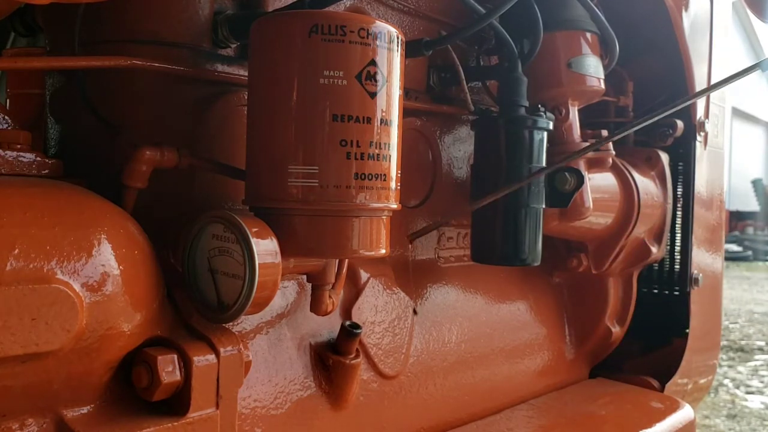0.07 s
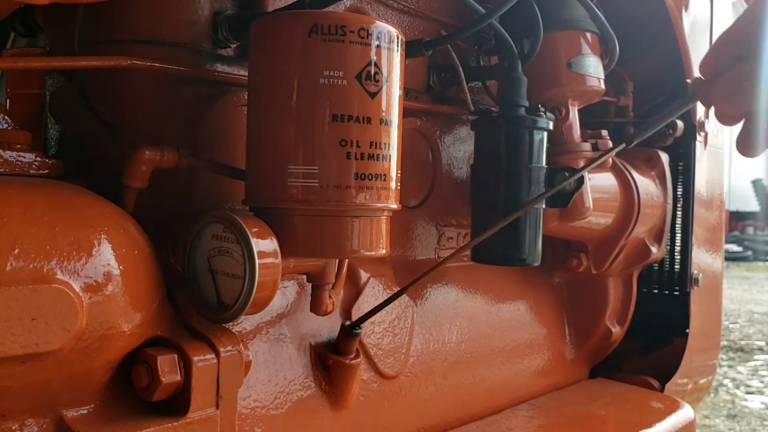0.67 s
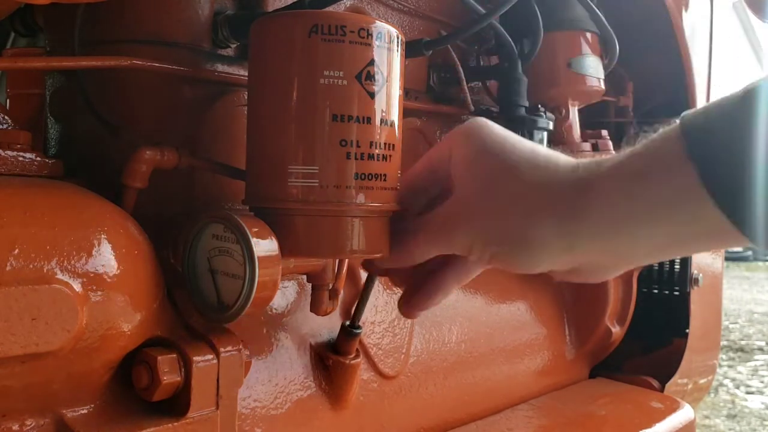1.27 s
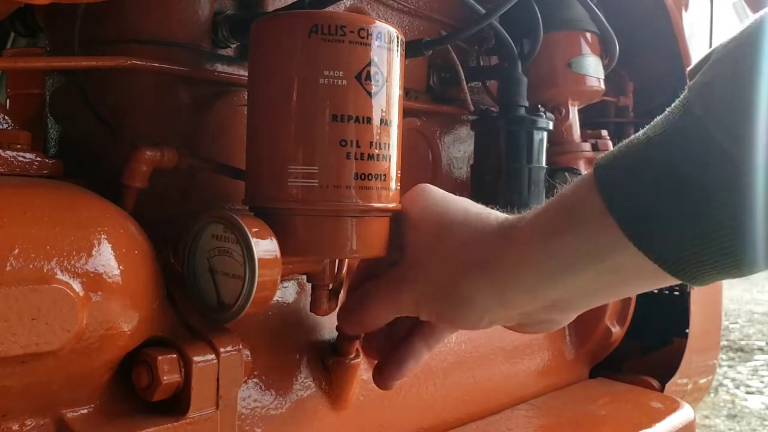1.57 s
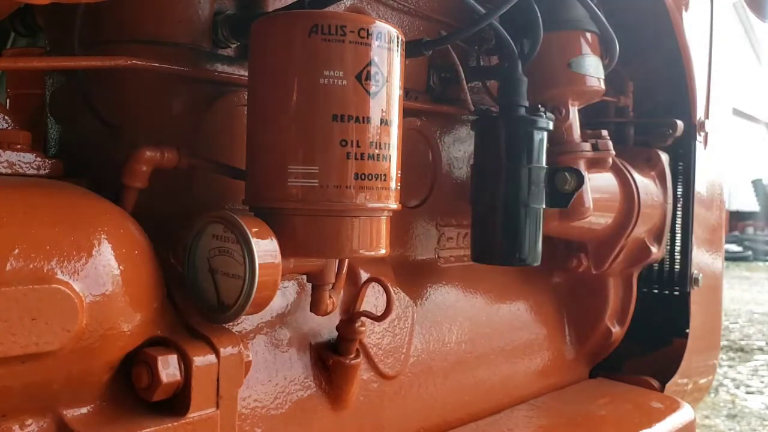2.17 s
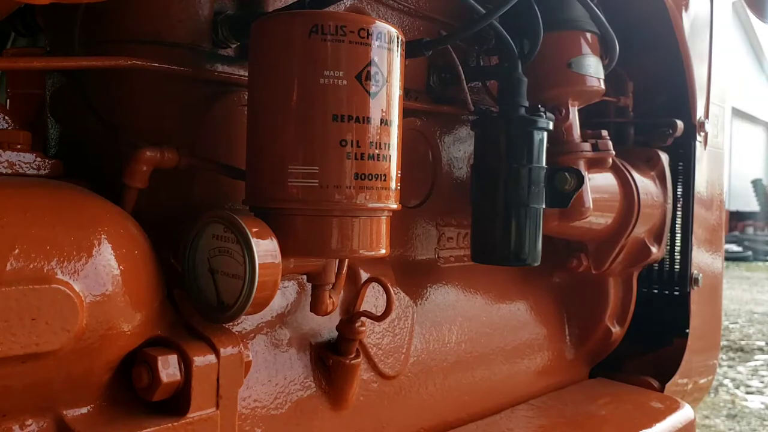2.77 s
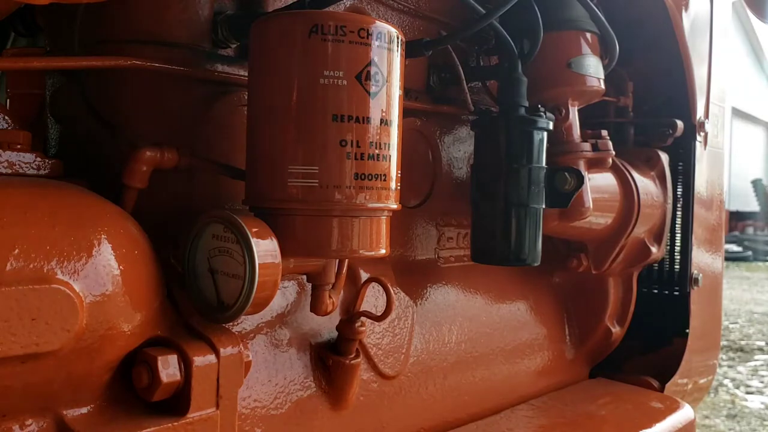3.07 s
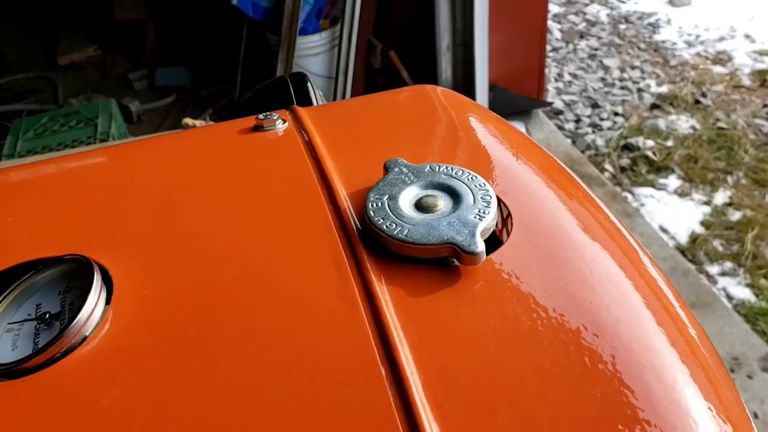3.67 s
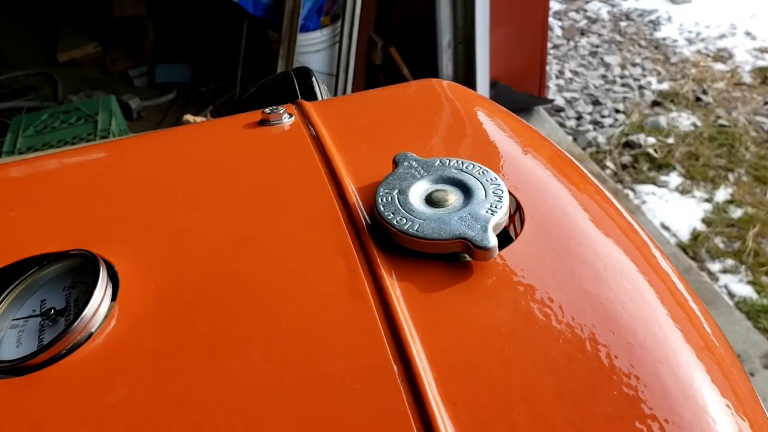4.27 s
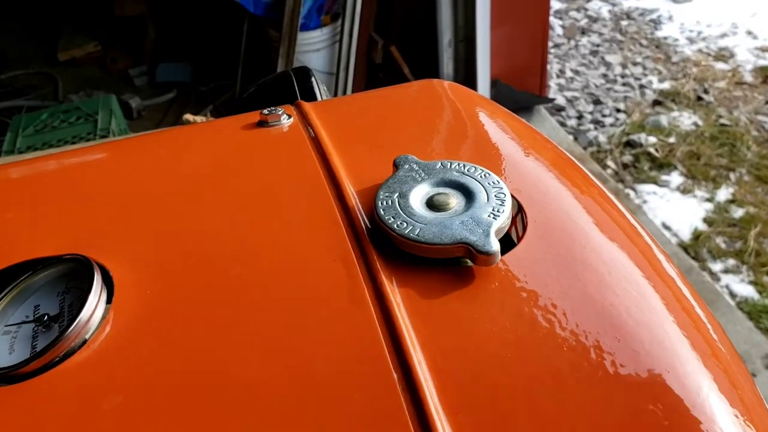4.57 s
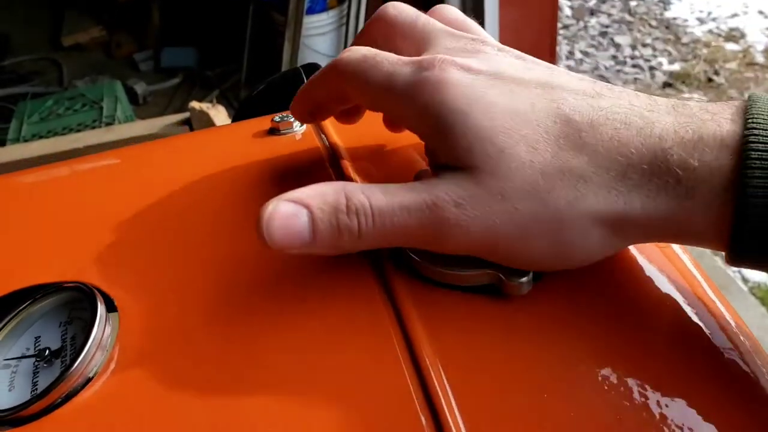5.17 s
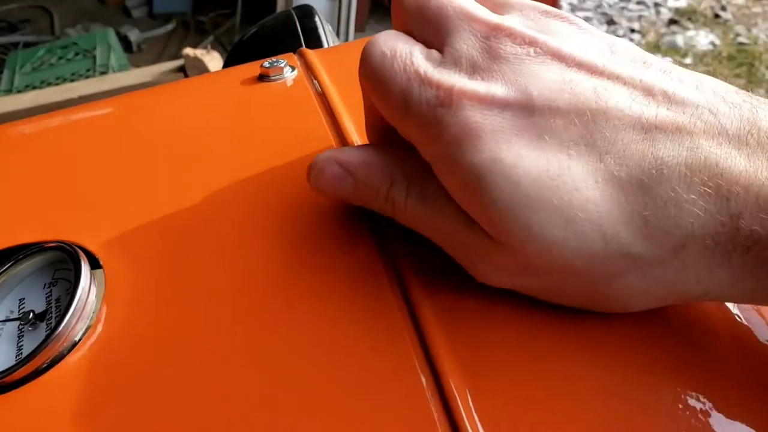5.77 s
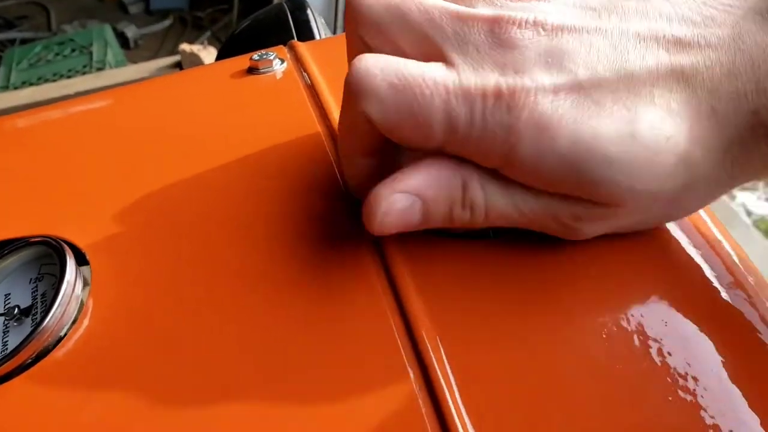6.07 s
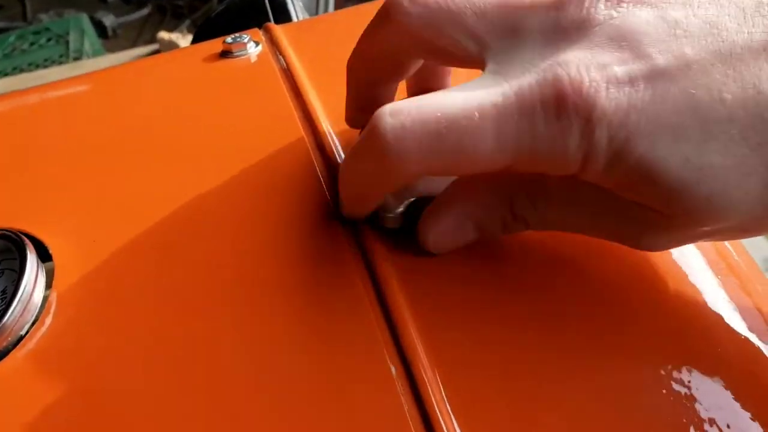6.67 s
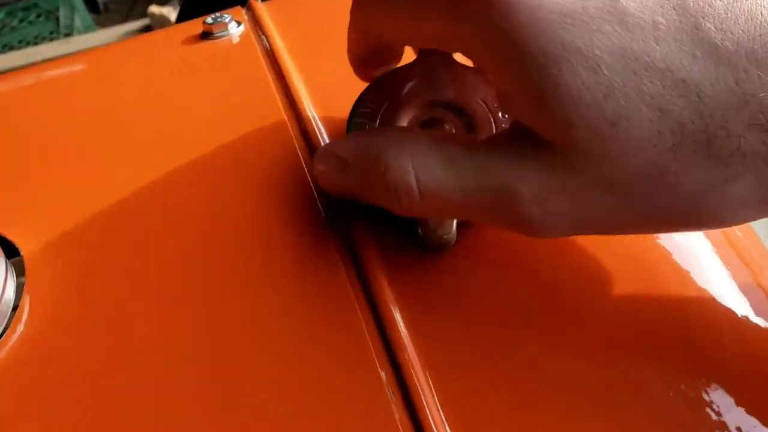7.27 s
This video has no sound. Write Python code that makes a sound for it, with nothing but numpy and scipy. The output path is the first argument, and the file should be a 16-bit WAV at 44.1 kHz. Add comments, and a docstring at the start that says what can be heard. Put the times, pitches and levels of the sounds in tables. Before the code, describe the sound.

A close stereo microphone in the open air hears light metallic taps and a short scrape as a dipstick goes home, followed by rustling cloth and a gritty shoe scuff. A quiet pause leaves only a faint, far rumble. Then a steel radiator cap turns with a low grinding groan and much louder hollow clunks, rings briefly like a small bell as it comes free, and clanks against the neck again.

```python
"""Outdoors beside a parked tractor, a stereo microphone close to the engine. A little to the right, a
dipstick ticks against its tube and slides home, a sleeve rustles, a shoe scuffs. Then, loudest, a hand
twists off the steel radiator cap: its lugs grind and knock on the filler neck, the radiator and
sheet-metal bonnet boom, and the loose cap pings once. A faint rumble from far off lies under it all."""
import sys
import numpy as np
from scipy import signal
from scipy.fft import rfft, irfft, next_fast_len
from scipy.io import wavfile
from scipy.ndimage import uniform_filter1d

SR = 44100
rng = np.random.default_rng(int(sys.argv[2]) if len(sys.argv) > 2 else 0)


def master_out(mix):
    """Clip the mix to full scale and print it as 16-bit PCM to the path in sys.argv[1]."""
    frames = np.transpose(np.atleast_2d(mix))
    ceiling = np.clip(frames, -1, 1)
    pcm = np.round(ceiling * 32767).astype(np.int16)
    wavfile.write(sys.argv[1], SR, pcm)


N = 331191
TIME = np.arange(N) / SR
TREBLE_HZ = 15500  # upper edge of the bright noises

# where the cap sits at the microphone: (frequency [Hz], left minus right [dB])
CAP_BALANCE = [(60, 5), (110, 1.5), (200, 1.5), (380, -6.5), (700, -2.5), (1290, -2.5), (2380, -4),
               (4400, -8), (8120, -11.5), (15000, -11)]
# how alike its two channels are: (frequency [Hz], correlation [0-1])
CAP_LIKENESS = [(100, .95), (300, 0.97), (700, 0.38), (1500, 0.31), (4000, 0.062), (15000, 0.061)]
AT_CAP = (CAP_BALANCE, CAP_LIKENESS)
# the shell, that is radiator, bonnet and filler neck: (mode [Hz], level [dB], t60 [s])
SHELL_MODES = [(140.5, -9, 0.35), (192.8, -7.5, 0.55), (229.2, -9, 0.87), (318, -8.5, 0.8), (353, -1, 0.23),
               (385, -9, 0.23), (443, -9, 0.18), (483, -11, 0.19), (494, -5, 0.15), (594, 4, 0.097),
               (735, -3, 0.27), (789, 1, 0.25), (887, -3, 0.31), (987, -4, 0.25), (1090, -0.5, 0.16),
               (1260, -2, 0.26), (1365, 0.5, 0.16), (1586, 4.5, 0.098), (1670, 2, 0.074), (2000, -11, 0.15),
               (2160, -16, 0.16), (2430, -16.5, 0.39), (2630, -11.5, 0.21), (2650, -13.5, 0.28),
               (2820, -23.5, 0.36), (4730, -23, 0.16), (5570, -4, 0.051), (8600, -7, 0.049),
               (12090, 12, 0.028)]
# its dense overtones: (frequency [Hz], level [dB])
SHELL_COLOUR = [(53, -48), (90, -0.5), (251, -5.5), (347, -1), (429, -4), (733, -3.5), (834, -8.5),
                (1390, -11.5), (1840, -17), (2480, -19), (3280, -30.5), (3980, -28), (8240, -37),
                (11900, -31.5), (15000, -31.5)]
# thud, clank and tick of a blow on it:
# (low [Hz], high [Hz], rise [s], crack t60 [s], tail t60 [s], tail [dB], modes [dB])
SHELL_BANDS = [(97, 751, 0.0023, 0.095, 0.57, -14.5, -7), (703, 7000, 0.0003, 0.027, 0.42, -14, -7.5),
               (2806, TREBLE_HZ, 0.0004, 0.019, .15, -10, -7.5)]
# the cap tapping the neck: (time [s], thud [dB], clank [dB], tick [dB], clank [Hz], tick [Hz])
CAP_TAPS = [(5.486, -66, -64, -58, 1300, 6700), (5.588, -78, -59, -66, 1110, 6070),
            (5.784, -63.5, -64.5, -60, 1380, 5800), (6.167, -42.5, -42.5, -54, 810, 5670),
            (6.343, -57, -54.5, -58, 1380, 3700), (6.384, -43, -52, -55.5, 1280, 4200),
            (6.678, -45, -47, -52, 1460, 4430), (6.718, -42, -42.5, -53, 1020, 5600),
            (6.975, -39.5, -38.5, -42, 1130, 4370), (7.289, -58, -50.5, -60.5, 1430, 5240),
            (7.323, -46, -35, -39, 1570, 3650), (7.425, -53, -44.5, -60, 1540, 3900),
            (7.466, -44, -42.5, -56.5, 1490, 3520)]
# the cap dropping over a notch:
# (time [s], thud [dB], clank [dB], tick [dB], thud [Hz], clank [Hz], tick [Hz], fall time [s])
CAP_DROPS = [(5.95, -32.5, -32, -31, 343, 1740, 5800, 0.0078),
             (6.527, -36, -41, -54, 620, 780, 4100, 0.0037),
             (6.684, -31, -37, -42.5, 345, 1410, 4430, .003),
             (6.816, -37.5, -36.5, -45, 382, 1230, 5500, .011),
             (7.333, -27.5, -26.5, -25.5, 335, 1620, 7440, 0.0066)]
# bright click, heavy landing and higher rebound within each drop:
# (delay [fall times], thud [dB], clank [dB], tick [dB], clank pitch [ratio])
DROP_CONTACTS = [(0, -4, -0.5, 0.5, 1.03), (0.999, -0.5, -4, -11, 1.04), (3.3, -3, -6.5, -32, 1.55)]


def cap_knocks():
    """Close by, the lugs tap the neck and drop over its notches; radiator and bonnet boom."""
    contacts = taps(CAP_TAPS, thud_hz=361)
    for s, thud, clank, tick, thud_hz, clank_hz, tick_hz, fall in CAP_DROPS:
        for delay, thud_db, clank_db, tick_db, ratio in DROP_CONTACTS:
            levels = (thud + thud_db, clank + clank_db, tick + tick_db)
            contacts.append((s + delay * fall, *levels, thud_hz, clank_hz * ratio, tick_hz))
    return blows(contacts, SHELL_MODES, SHELL_COLOUR, SHELL_BANDS, AT_CAP, contact_db=11, snap_db=0.5)


# short turns of the wrist: (middle [s], length [s], groan [dB])
WRIST_TURNS = [(5.3, 0.16, -62), (5.63, 0.15, -60), (5.84, 0.22, -57.5), (6.01, 0.076, -44.5),
               (6.11, 0.12, -44), (6.29, 0.094, -49.5), (6.41, 0.15, -55), (6.58, 0.22, -50.5),
               (6.76, 0.16, -47), (6.89, 0.29, -51), (7.16, 0.21, -52.5), (7.42, 0.37, -48.5)]
# fingers or the cap's rim slipping over steel: (middle [s], length [s], grit [dB])
RIM_SLIPS = [(5.24, 0.14, -67), (5.48, 0.21, -66), (5.64, 0.23, -70.5), (6.14, 0.21, -54.5),
             (6.68, 0.091, -59), (7.347, 0.036, -39)]
# low groan of the cap on its seat: (frequency [Hz], level [dB])
GROAN_COLOUR = [(71, -36), (120, 4), (211, -2.5), (277, 3), (352, 4), (455, -9), (572, -6.5), (682, -24),
                (759, -11.5), (1120, -12), (1490, -13), (1820, -17.5), (2170, -18), (2690, -25),
                (3000, -26), (3900, -46), (6600, -120)]
# high grit of rubbed steel: (frequency [Hz], level [dB])
GRIT_COLOUR = [(1470, -37), (2500, 1), (2850, -2), (3580, -8), (3920, -3.5), (4990, -6), (5870, -3),
               (8860, -12.5), (12100, 1), (14500, -4)]


def cap_grind():
    """Each turn grinds the lugs round the neck: a groan in the shell's low modes, with grit on top."""
    groan_gain = swells(WRIST_TURNS)
    grit_gain = np.hypot(undb(-16) * groan_gain, swells(RIM_SLIPS))
    shell = rub(N, [m for m in SHELL_MODES if m[0] < 700], AT_CAP, rate=140)
    friction = noise(N, GROAN_COLOUR, 145, 3900, AT_CAP) * undb(1.1 * walk(N, 90))
    groan = unit(friction + undb(-5) * shell)
    grit = unit(noise(N, GRIT_COLOUR, 3300, TREBLE_HZ, AT_CAP) * undb(1.9 * walk(N, 500)))
    return groan_gain * groan + grit_gain * grit


# the cap hanging free: (mode [Hz], level [dB], t60 [s])
CAP_MODES = [(1156, -0.5, 0.89), (3950, 1, 0.04), (4840, -6, .1), (5620, -16, 0.17), (7920, -10, 0.078),
             (8920, -33, .11), (11800, 10.5, 0.017)]


def cap_ping():
    """The freed cap rings like a small bell until the fingers close on it again."""
    out, t = np.zeros((2, N)), np.arange(SR) / SR
    ping = ring(t, CAP_MODES, AT_CAP, scatter_db=0, detune=0)
    grip = np.interp(t, [.16, .22], [1, 0])
    add(out, 6.976, undb(-38) * ping * grip)
    return out


# the engine's side, to the right of the microphone: (frequency [Hz], left minus right [dB])
ENGINE_BALANCE = [(60, -7), (110, -8.5), (200, -13), (380, -7), (700, -9), (1290, -3.0), (2380, -6.5),
                  (4400, -11), (8120, -14), (15000, -16.5)]
# how alike its two channels are: (frequency [Hz], correlation [0-1])
ENGINE_LIKENESS = [(100, 0.9), (300, 0.57), (700, 0.046), (1500, 0), (15000, 0.066)]
AT_ENGINE = (ENGINE_BALANCE, ENGINE_LIKENESS)
# the dipstick's steel blade in its tube: (mode [Hz], level [dB], t60 [s])
BLADE_MODES = [(537, -3, 0.1), (1200, -10, 0.45), (1408, -1, 0.11), (1640, -6.5, .1), (1875, -3, 0.098),
               (2800, -6, 0.047), (4500, -4, 0.1), (5300, -19.5, 0.0288), (5650, -9, 0.0286),
               (5600, 4.5, 0.06), (6800, -5.5, 0.035), (7770, -1, 0.0322), (11300, -6, .03),
               (13000, 3, 0.039)]
# its dense overtones: (frequency [Hz], level [dB])
BLADE_COLOUR = [(88, -34.5), (150, 5), (225, -10.5), (486, 2.5), (818, -7.5), (1840, -1.5), (2230, -10),
                (2700, -5.5), (3600, -19), (5510, -8.5), (6060, -14), (7940, -11), (8920, -19.5),
                (13100, -7.5), (15000, -20.5)]
# thud, clank and tick of a blow on it:
# (low [Hz], high [Hz], rise [s], crack t60 [s], tail t60 [s], tail [dB], modes [dB])
BLADE_BANDS = [(197, 490, 0.003, 0.069, 0.29, -3, -8), (715, 4200, 0.001, 0.027, 0.23, -15.5, -10),
               (2990, TREBLE_HZ, 0.000081, 0.028, .055, -9.5, -8)]
# blade and fingers touching the tube: (time [s], thud [dB], clank [dB], tick [dB], clank [Hz], tick [Hz])
TUBE_TAPS = [(0.234, -86, -57, -57.5, 2800, 3200), (0.51, -90, -62, -50, 1940, 5600),
             (0.548, -93, -63, -52.5, 2220, 5400), (0.561, -96, -74, -49, 1784, 5600),
             (0.572, -91, -64.5, -52, 1950, 5600), (1.191, -70.5, -64, -42.5, 1850, 7600),
             (1.229, -82, -55, -44.5, 1390, 5630), (1.329, -56.5, -42, -38.5, 1820, 5100),
             (1.461, -52.5, -54.5, -66, 1090, 6400), (1.536, -61, -58.5, -78, 1220, 6360),
             (1.719, -82, -54, -57.5, 2870, 3240)]
# pushes down the tube: (time [s], length [s], rasp [dB], note [dB], start [Hz], end [Hz])
BLADE_SLIDES = [(0.989, 0.024, -57, -78, 1950, 1930), (1.004, 0.011, -50.5, -75, 1920, 1790),
                (1.084, 0.017, -60.5, -84, 1880, 1800), (1.189, 0.038, -43, -49, 1775, 1487),
                (1.28, 0.025, -58, -57, 1940, 1638), (1.326, 0.052, -79, -56.5, 1318, 1133),
                (1.457, 0.083, -84, -58, 866, 503)]


def dipstick():
    """Near right, the blade taps the tube's mouth and rasps down it, its note falling as it goes deeper."""
    contacts = taps(TUBE_TAPS, thud_hz=504)
    out = blows(contacts, BLADE_MODES, BLADE_COLOUR, BLADE_BANDS, AT_ENGINE, contact_db=8, snap_db=2)
    high_modes = [m for m in BLADE_MODES if m[0] > 2500]
    for s, length, rasp_db, note_db, start_hz, end_hz in BLADE_SLIDES:
        n = int((length + .08) * SR)
        t = np.arange(n) / SR
        push = np.minimum(t / 0.0053, 1) * fade(np.maximum(t - length, 0), t60=0.1)
        grit = noise(n, BLADE_COLOUR, 4600, TREBLE_HZ, AT_ENGINE) * undb(4.5 * walk(n, 700))
        rasp = unit(grit + undb(-3.5) * rub(n, high_modes, AT_ENGINE, rate=1400))
        note = narrow(np.interp(t, [0, length], [start_hz, end_hz]), width_hz=0.35 * start_hz)
        add(out, s, push * (undb(rasp_db) * rasp + undb(note_db) * note))
    return out


# a shoe dragged over grit: (frequency [Hz], level [dB])
SCUFF_COLOUR = [(150, -44), (250, -15.5), (559, -5), (620, -6), (687, -1), (873, -13.5), (1000, -5.5),
                (1590, -7.5), (1920, -15.5), (2480, -7), (2800, -12.5), (5010, -12.5), (8970, -23),
                (12000, -10), (15000, -19)]
# weight coming onto the sole: (middle [s], length [s], level [dB])
SOLE_PRESS = [(2.608, 0.08, -43.5)]
# soft bumps, taps and a snap of shifting feet: (time [s], level [dB], low [Hz], high [Hz], t60 [s])
FOOT_BUMPS = [(1.952, -48.5, 120, 600, 0.026), (1.998, -47.5, 90.5, 290, 0.11),
              (2.108, -48.5, 110, 565, 0.078), (2.321, -54.5, 784, 1800, 0.18),
              (2.757, -54, 700, 15000, 0.021), (3.934, -63.5, 594, 1840, 0.015),
              (3.938, -42.5, 50, 119, 0.042)]
# uncoloured noise: (frequency [Hz], level [dB])
FLAT = [(20, 0), (20000, 0)]


def feet():
    """Beside the engine, weight shifts with soft bumps; one sole squeals as it slips and drags over grit."""
    scuff_s, attack_s, hold_s = 2.558, 0.0015, 0.023
    since = TIME - scuff_s
    bite = np.clip(since / attack_s, 0, 1) * fade(np.maximum(since - hold_s, 0), t60=0.27)
    sole = unit(noise(N, SCUFF_COLOUR, 247, 3000, AT_ENGINE) * undb(1.6 * walk(N, 300)))
    grit = unit(noise(N, SCUFF_COLOUR, 2000, TREBLE_HZ, AT_ENGINE) * undb(0.79 * walk(N, 1000)))
    out = swells(SOLE_PRESS) * sole + undb(-39.5) * bite * grit
    t = np.arange(SR // 4) / SR
    squeal = narrow(np.full(len(t), 5050), width_hz=380) * fade(t, t60=.08)
    add(out, 2.559, undb(-46) * squeal)
    for s, db, lo, hi, t60 in FOOT_BUMPS:
        onset = 1 - np.exp(-t * hi / 2)
        bump = noise(len(t), FLAT, lo, hi, AT_ENGINE) * fade(t, t60) * onset
        add(out, s, undb(db) * unit_hit(bump))
    return out


# rubbing cloth: (frequency [Hz], level [dB])
SLEEVE_COLOUR = [(150, -18), (250, -2.5), (307, -2.5), (471, -5.5), (589, -4), (858, -5.5), (951, -3),
                 (2850, -11), (3810, -16), (5950, -11.5), (8820, -20), (13300, -6.5), (15000, -15.5)]
# strokes of the arm: (middle [s], length [s], hiss [dB])
SLEEVE_SWISHES = [(.1, 0.63, -54.5), (.94, 0.39, -64), (1.32, 0.74, -62), (1.79, 0.35, -62),
                  (2.08, 0.25, -55.5), (2.37, 0.37, -58), (2.72, 0.31, -65.5), (2.98, 0.41, -86),
                  (4.48, 0.67, -78), (4.92, 0.43, -75)]


def sleeve():
    """Cloth slides on cloth near the microphone: fine hiss over soft flapping, following the arm's speed."""
    hiss = noise(N, SLEEVE_COLOUR, 3560, TREBLE_HZ, AT_ENGINE)
    hiss = unit(hiss * undb(0.91 * walk(N, 28.85) + 1.1 * walk(N, 700)))
    flap = unit(noise(N, SLEEVE_COLOUR, 295, 4120, AT_ENGINE) * undb(2 * walk(N, 40)))
    return swells(SLEEVE_SWISHES) * (hiss + undb(-2) * flap)


# the distant rumble: (frequency [Hz], level [dB])
RUMBLE_COLOUR = [(25, -18.5), (60, 2.5), (128, -4), (231, -14), (330, -25), (700, -34.5), (1100, -28),
                 (2100, -32), (2500, -40.5), (7700, -55), (13500, -44), (15000, -52)]
# the faint whirr above it: (centre [Hz], width [Hz], level [dB])
WHIRR_BANDS = [(1338, 290, -77.5), (1894, 450, -76)]
FAR = ([(100, -1.3), (15000, -0.9)], ENGINE_LIKENESS)  # almost centred


def background():
    """Far from the microphone a rumble wavers, with a faint whirr above it."""
    out = undb(-56) * noise(N, RUMBLE_COLOUR, 16, TREBLE_HZ, FAR) * undb(2.3 * walk(N, 5.8))
    for hz, width, db in WHIRR_BANDS:
        gain = undb(db + 1.7 * walk(N, 2.46))
        out += gain * narrow(hz * (1 + 0.024 * walk(N, 5)), width)
    return out


def blows(contacts, modes, colour, bands, place, contact_db, snap_db):
    """Each band of a blow is a snap, a crack, a dense tail and clear modes; the lows swell late and stay."""
    out, t = np.zeros((2, N)), np.arange(SR // 2) / SR
    grid = np.geomspace(50, 16000, 200)
    for s, *columns in contacts:
        for db, contact_hz, band in zip(columns[:3], columns[3:], bands):
            lo, hi, rise, crack_t60, tail_t60, tail_db, modes_db = band
            focused = np.column_stack([grid, at(colour, grid) + favour(grid, contact_hz, contact_db)])
            snap = undb(snap_db) * fade(t, t60=0.0067)
            strike = noise(len(t), focused, lo, hi, place) * (fade(t, crack_t60) + snap)
            tail = noise(len(t), colour, lo, hi, place) * fade(t, tail_t60)
            struck = [(hz, level + favour(hz, contact_hz, contact_db / 2), t60)
                      for hz, level, t60 in modes if lo <= hz < hi]
            clear = unit_hit(ring(t, struck, place, scatter_db=4, detune=0.0023))
            blow = (strike + undb(tail_db) * tail + undb(modes_db) * clear) * (1 - np.exp(-t / rise))
            add(out, s, undb(db) * unit_hit(blow))
    return out


def taps(table, thud_hz):
    """Single contacts that share their body's low note."""
    return [(s, *levels, thud_hz, clank_hz, tick_hz) for s, *levels, clank_hz, tick_hz in table]


def favour(hz, contact_hz, boost_db):
    """The point of contact favours a narrow range of the body's overtones."""
    return boost_db * np.exp(-(np.log2(hz / contact_hz) / 0.25) ** 2)


def rub(n, modes, place, rate):
    """Stick-slip: random slips of uneven size, about rate a second, ring a body's modes."""
    slips = (rng.random(n) < rate / SR) * rng.laplace(size=n)
    body = ring(np.arange(SR // 3) / SR, modes, place, scatter_db=-3, detune=0)
    return unit(signal.fftconvolve(slips[None], body, axes=1)[:, :n])


def ring(t, modes, place, scatter_db, detune):
    """Decaying modes; each contact point weights them a little differently."""
    out = np.zeros((2, len(t)))
    balance, likeness = place
    sign = np.array([[1], [-1]])
    for (hz, db, t60), (size, shift, phase) in zip(modes, rng.standard_normal((len(modes), 3))):
        lag = np.arccos(np.clip(at(likeness, hz), -1, 1)) * np.sign(phase) / 2
        wave = np.sin(2 * np.pi * (hz * (1 + detune * shift) * t + phase) + sign * lag)
        out += undb(db + scatter_db * size + sign * at(balance, hz) / 2) * fade(t, t60) * wave
    return out


def noise(n, colour, lo_hz, hi_hz, place):
    """Coloured stereo noise between two edges, as it reaches the microphone from a place."""
    balance, likeness = place
    size = next_fast_len(n, True)
    hz = np.arange(size // 2 + 1) * SR / size + 1
    mid, side = rfft(rng.standard_normal((2, size)))
    sign, alike = np.array([[1], [-1]]), np.clip(at(likeness, hz), -1, 1)
    edges = ((1 + (lo_hz / hz) ** 12) * (1 + (hz / hi_hz) ** 12)) ** -.5
    pair = mid * np.sqrt(1 + alike) + sign * side * np.sqrt(1 - alike)
    gain = undb(at(colour, hz) + sign * at(balance, hz) / 2)
    return unit(irfft(pair * edges * gain, size)[:, :n])


def narrow(hz, width_hz):
    """A narrow band of stereo noise whose centre follows hz."""
    diffuse = (FLAT, FLAT)  # equally loud, unrelated channels
    a, b = (noise(len(hz), FLAT, 0.85, width_hz / 2, diffuse) for _ in range(2))
    phase = 2 * np.pi * np.cumsum(hz) / SR
    return unit(a * np.cos(phase) + b * np.sin(phase))


def swells(table):
    """Gain of strokes that speed up and slow down again: one smooth bell each, added in power."""
    return np.sqrt(sum(undb(2 * db) * np.exp(-2 * np.minimum((2 * (TIME - s) / length) ** 2, 20))
                       for s, length, db in table))


def walk(n, rate):
    """Random levels held 1 / rate s and slewed."""
    hold = max(2, int(SR / rate))
    return 0.96 * uniform_filter1d(np.repeat(rng.standard_normal(n // hold + 1), hold), hold)[:n]


def undb(db):
    """Decibels to gain."""
    return 10 ** (np.asarray(db) / 20)


def at(points, hz):
    """Read (Hz, value) points on a log-frequency axis."""
    freqs, values = np.transpose(points)
    return np.interp(np.log(np.maximum(hz, 1)), np.log(freqs), values)


def unit(x):
    """Scale a stereo sound so that its centre has rms 1."""
    return x / (np.sqrt(np.mean(x.mean(0) ** 2)) + 1e-12)


def unit_hit(x):
    """Scale a blow so that its loudest 8 ms have rms 1."""
    return x / np.sqrt(uniform_filter1d(x.mean(0) ** 2, size=353, mode="constant").max() + 1e-18)


def fade(t, t60):
    """Exponential decay, 60 dB in t60 seconds."""
    return np.exp(-np.log(1000) * t / t60)


def add(out, s, x):
    """Mix x into out from time s."""
    i = int(s * SR)
    out[:, i:i + x.shape[1]] += x[:, :N - i]


def scene():
    """The close work on the tractor and the far background meet at the microphone in open air."""
    return dipstick() + cap_knocks() + cap_grind() + cap_ping() + sleeve() + feet() + background()


def record(dry):
    """The recorder cuts the top steeply above 14650 Hz."""
    return signal.sosfilt(signal.ellip(10, .2, 70, 14650, fs=SR, output="sos"), dry)


dry = scene()
out = record(dry)
master_out(out)
```